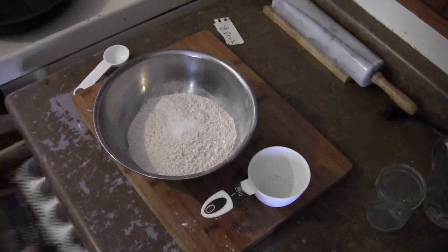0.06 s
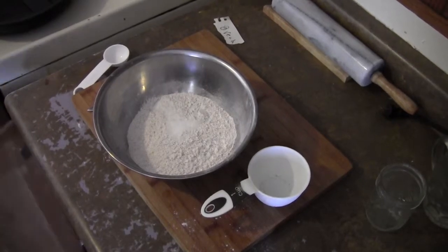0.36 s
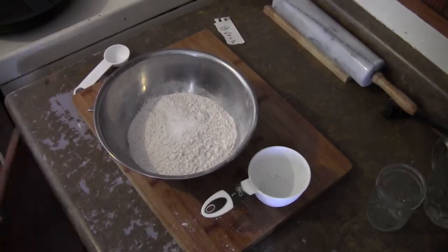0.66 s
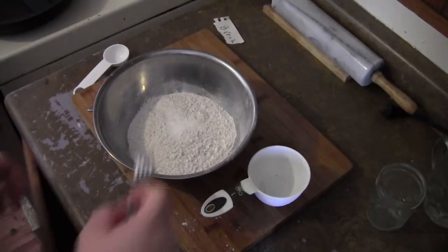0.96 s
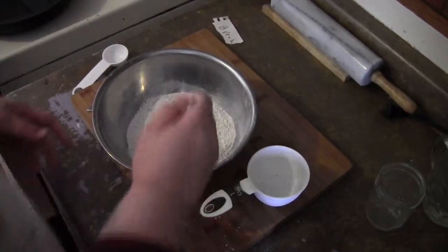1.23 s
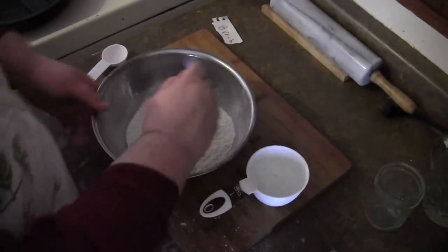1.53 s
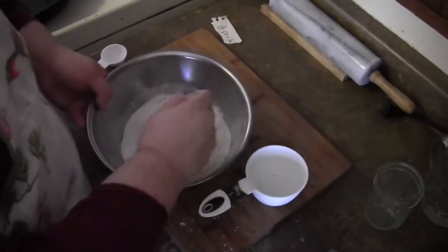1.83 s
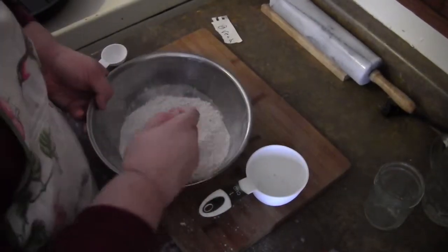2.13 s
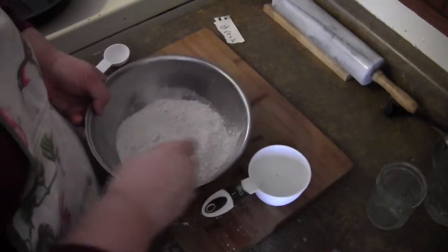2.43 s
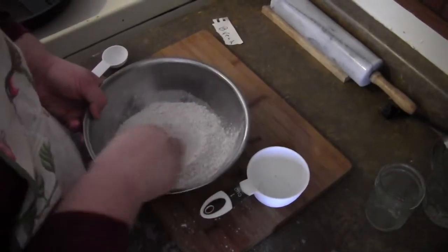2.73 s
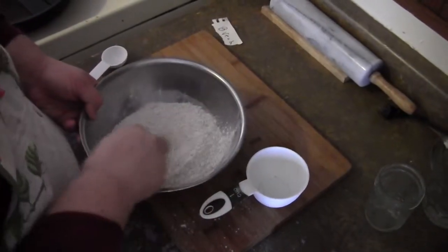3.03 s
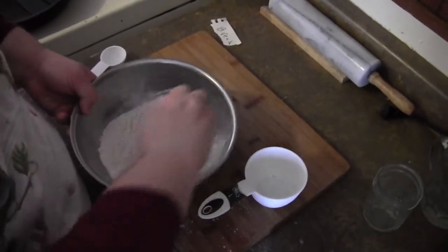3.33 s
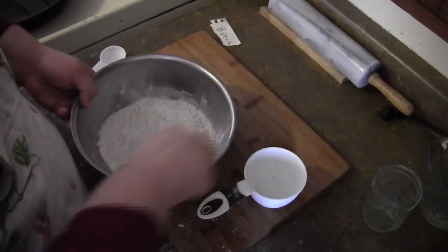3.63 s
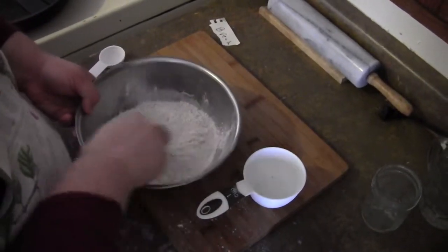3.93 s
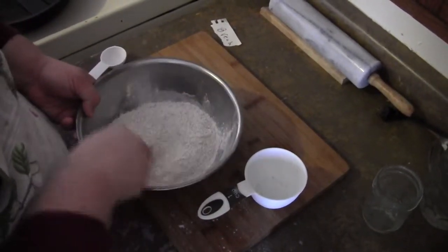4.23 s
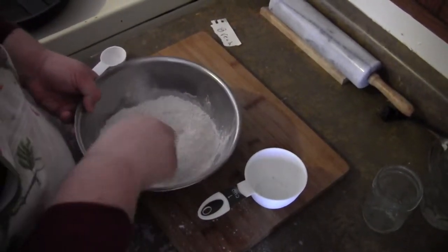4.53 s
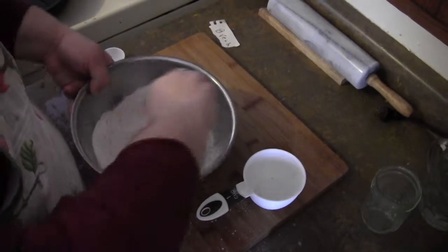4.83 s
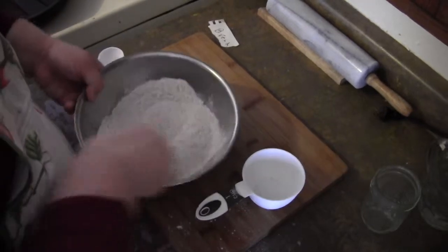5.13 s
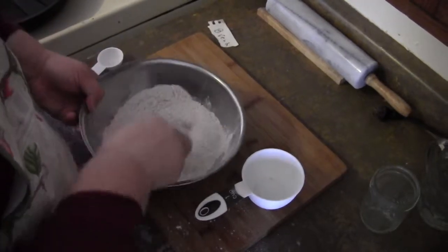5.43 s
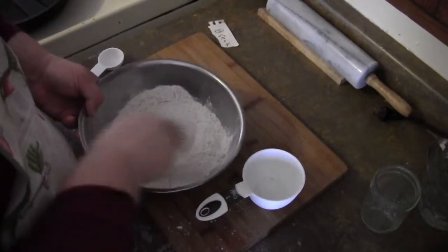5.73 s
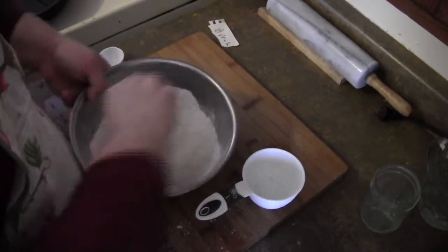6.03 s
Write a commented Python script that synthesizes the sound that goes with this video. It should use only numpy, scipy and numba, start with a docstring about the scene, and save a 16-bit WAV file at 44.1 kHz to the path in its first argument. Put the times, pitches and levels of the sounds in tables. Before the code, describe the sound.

A wooden drawer rumbles along its runners and bangs shut, the cutlery inside jangling. A fork clinks against a steel bowl, whose rim rings faintly, and the bowl knocks several times on a wooden board. Then the fork stirs dry flour in soft, gritty, uneven strokes, with light ticks, low bumps and one louder hollow thud. The sounds are close and near the centre, in a quiet home kitchen.

```python
"""A cutlery drawer rumbles shut in a home kitchen, its contents rattling, and bangs on its stop.
A fork clinks, a steel bowl knocks on a wooden board as it is pulled closer, then the fork stirs dry
flour and salt in slow strokes, scraping and tapping the bowl. Runners, cutlery and powder are streams
of tiny contacts that excite wood and steel; each blow is a crack, dying noise and the struck body's ring."""
import sys
import numpy as np
from scipy import signal
from scipy.fft import rfft, irfft, next_fast_len
from scipy.io import wavfile
from scipy.ndimage import uniform_filter1d
from numba import njit

SR = 44100
rng = np.random.default_rng(int(sys.argv[2]) if len(sys.argv) > 2 else 0)


def dump(signal):
    """Clip the signal to [-1, 1] and save it as 16-bit WAV at the path in sys.argv[1]."""
    limited = np.clip(np.atleast_2d(signal).T, -1, 1)
    pcm = np.round(limited * 32767).astype(np.int16)
    wavfile.write(sys.argv[1], SR, pcm)


N = 267863
TIME = np.arange(N) / SR

# how hard the runners shake the drawer: (time [s], level [dB])
RUNNER_SHAKE = [(0.0, -22.5), (0.058, -22), (0.1, -16), (0.132, -24.5), (0.278, -14), (0.318, -21),
                (0.426, -23), (0.44, -18.5)]


def from_db(db):
    return 10 ** (np.asarray(db) / 20)


def rms_one(x):
    return x / np.sqrt(np.mean(x ** 2) + 1e-20)


def even(x):
    """Hold the level at 1 over a twentieth of a second, keeping the fine grit."""
    return x / np.sqrt(np.maximum(uniform_filter1d(x * x, size=2205), 1e-12))


def at_hz(points, hz):
    """Read a table on a log-frequency axis."""
    points_hz, values = np.transpose(points)
    return np.interp(np.log(np.maximum(hz, 1)), np.log(points_hz), values)


def level(rows):
    """Gain from a curve in dB, fading quickly after its end."""
    s, db = np.transpose(rows)
    return from_db(np.interp(TIME, s, db)) * np.exp(-np.maximum(TIME - s[-1], 0) / 0.056)


def envelope(s, length, attack_s, t60):
    """Linear attack, hold, exponential release."""
    attack = np.clip((TIME - s) / attack_s, 0, 1)
    return attack * from_db(-60 * np.clip((TIME - s - length) / t60, 0, 2))


def add(track, s, sound):
    """Lay a sound into a track at a time."""
    start = round(s * SR)
    track[start:start + len(sound)] += sound[:N - start]


def butter(x, order, hz, kind="low"):
    return signal.sosfilt(signal.butter(order, hz, kind, fs=SR, output="sos"), x)


def colour(x, spectrum, tilt_db=0):
    """Minimum-phase EQ of unit power gain, tilted per octave above 300 Hz."""
    size = 2 * next_fast_len(len(x) // 2 + 4096)
    hz = np.arange(size // 2 + 1) * SR / size
    gain = rms_one(from_db(at_hz(spectrum, hz) + tilt_db * np.log2(np.maximum(hz / 300, 1))))
    cepstrum = irfft(np.log(gain + 1e-9))[:size // 2]
    cepstrum[1:] *= 2
    return irfft(rfft(x, size) * np.exp(rfft(cepstrum, size)))[:len(x)]


def resonate(x, hz, width_hz):
    """Two-pole resonance with gain 1 at its peak."""
    r = np.exp(-np.pi * width_hz / SR)
    feedback = [1, -2 * r * np.cos(2 * np.pi * hz / SR), r * r]
    return signal.lfilter(np.array([1, 0, -1]) * (1 - r * r) / 2, feedback, x + 1e-18)


@njit
def glide(x, angle, r):
    """Two-pole resonance whose centre (radians a sample) moves."""
    out = np.zeros(len(x))
    for i in range(2, len(x)):
        drive = (1 - r * r) / 2 * (x[i] - x[i - 2])
        out[i] = drive + 2 * r * np.cos(angle[i]) * out[i - 1] - r * r * out[i - 2]
    return out


def drift(per_s):
    """Random wander; rms 1."""
    knots = rng.standard_normal(2048)
    return rms_one(np.interp(TIME * per_s, np.arange(len(knots)), knots))


def grains(per_s, spread_db):
    """Random tiny contacts of uneven size; rms 1."""
    sizes = from_db(spread_db * np.minimum(rng.exponential(1, N), 4)) * rng.choice([-1, 1], N)
    return rms_one(sizes * (rng.random(N) < per_s / SR))


def dying_noise(t):
    """Dense resonances, every band fading at its own pace."""
    # how wood and kitchen ring on after a blow: (frequency [Hz], t60 [s])
    decays = [(80, 0.66), (250, 0.37), (600, 0.39), (1500, 0.31), (4000, 0.28), (11000, 0.47)]
    out, edges = 0, np.geomspace(30, 18000, 12)
    white = rfft(rng.choice([-1., 1.], len(t)))
    hz = np.arange(len(t) // 2 + 1) * SR / len(t)
    for low, high in zip(edges, edges[1:]):
        band = irfft(white * ((hz >= low) & (hz < high)), len(t))
        out = out + band * from_db(-60 * t / at_hz(decays, np.sqrt(low * high)))
    return out


def blows(rows, spectrum, crack, clatter_t60, tail_db, modes=(), modes_db=0):
    """Each blow is a crack, a quickly dying clatter, a room tail and any modes given for the body."""
    out, t = np.zeros(N), TIME[:SR]
    for s, db, tilt_db in rows:
        clatter = rng.choice([-1., 1.], len(t)) * from_db(-60 * t / clatter_t60)
        force = clatter + from_db(tail_db) * dying_noise(t)
        force[0] += crack
        sound = colour(force, spectrum, tilt_db)
        for k, (hz, mode_db, t60) in enumerate(modes):
            strength_db = modes_db + mode_db + tilt_db * np.log2(max(hz / 300, 1)) + rng.normal(0, 5.3)
            sound += (-1) ** k * from_db(strength_db - 60 * t / t60) * np.sin(2 * np.pi * hz * t)
        add(out, s, from_db(db) * sound)
    return out


def kitchen(x, wet_db, t60):
    """Direct sound plus diffuse reflections from the counter and walls."""
    t = TIME[:SR // 2]
    echoes = rng.standard_normal(len(t)) * from_db(-60 * t / t60) * (t > .003)
    return x + from_db(wet_db) * signal.fftconvolve(x, echoes / np.linalg.norm(echoes))[:N]


def stereo(x, pan_db, wide_db):
    """Left and right are nearly alike; late reflections part them, most in the treble."""
    # stereo width: (frequency [Hz], side over mid [dB])
    width = [(60, -33.5), (120, -27), (220, -21), (400, -15.5), (1000, -17.5), (4000, -17), (8000, -14),
             (14000, -3.5)]
    hz = np.arange(N + 1) * SR / (2 * N)
    delay = np.exp(-2j * np.pi * hz * .004)
    side = rfft(x, 2 * N) * from_db(wide_db + at_hz(width, hz)) * delay
    for lag in rng.uniform(.002, .007, 3):
        echo = np.exp(-2j * np.pi * hz * lag)
        side = side * (echo - .5) / (1 - .5 * echo)  # all-pass scatter
    side = irfft(side)[:N]
    return np.array([(x + side) * from_db(pan_db / 2), (x - side) * from_db(-pan_db / 2)])


def room_tone():
    """A faint, steady bed of dark noise."""
    # tone of the quiet kitchen: (frequency [Hz], level [dB])
    room_eq = [(15, -27.5), (25, -11), (102, 0.5), (187, -7.5), (257, 0), (363, -9.5), (436, -7.5),
               (525, -10.5), (666, -6.5), (892, -9.5), (966, -13), (4250, -22), (14000, -37.5)]
    return from_db(-56) * colour(rng.standard_normal(N), room_eq)


def drawer():
    """Rough runners shake the wooden box until it bangs shut."""
    # tone of the rolling box: (frequency [Hz], level [dB])
    rumble_eq = [(26, -55.5), (45, -20), (64, -6), (138, -2), (299, -9), (536, -6.5), (589, -17.5),
                 (743, -9), (1110, -17.5), (1680, -18.5), (1810, -25), (1980, -27.5), (2130, -24),
                 (12000, -66.5), (15600, -83), (22000, -120)]
    # the drawer meets its catch and its stop: (time [s], level [dB], treble tilt [dB/octave])
    hits = [(.093, -34, -10.5), (.223, -13, 2.5), (.270, -13, -2), (.464, -4.5, -2.5), (.486, -5.5, -3.5),
            (.562, -13.5, -2), (.606, -17, -3), (.796, -37, 1.5), (.829, -39, -13), (.851, -39, 0.5),
            (.958, -44.5, -2)]
    # tone of the struck box: (frequency [Hz], level [dB])
    bang_eq = [(29, -48.5), (50, -25), (98, -13), (370, -10.5), (524, -4), (603, -7), (895, -3.5),
               (1330, -6.5), (1600, -6), (1720, -7.5), (4670, -21.5), (6620, -29), (10100, -41.5),
               (13000, -56)]
    rumble = colour(grains(per_s=2700, spread_db=1.0), rumble_eq) * level(RUNNER_SHAKE)
    bangs = blows(hits, bang_eq, crack=9.3, clatter_t60=0.048, tail_db=-1.5)
    return from_db(-1.5) * rumble + from_db(-3.5) * bangs


def cutlery():
    """Colliding pieces ring with their own partials, rattling with the runners and jangling at jolts."""
    # jolts to the cutlery: (time [s], length [s], level [dB])
    jolts = [(0.188, 0.02, -35), (0.229, 0.02, -27), (0.461, 0.13, -28), (0.728, 0.024, -41.5),
             (0.974, 0.032, -60)]
    # tone of the jangle: (frequency [Hz], level [dB])
    jangle_eq = [(700, -30.5), (1500, -2.5), (2500, 4.5), (3500, -1.5), (4800, -9), (6600, -0.5),
                 (8000, -5.5), (10000, -6.5), (12500, -14.5), (15000, -23.5)]
    rings = 0
    for partials_hz in rng.uniform(1300, 14000, size=(12, 10)):  # 12 pieces, 10 partials each
        hits = grains(per_s=70, spread_db=3.5)
        ring = rms_one(sum(resonate(hits, hz, width_hz=27) for hz in partials_hz))
        rings = rings + 0.38 * hits + ring
    jangle = sum(from_db(db) * envelope(s, length, attack_s=0.023, t60=0.17) for s, length, db in jolts)
    rattle = from_db(-33.5) * level(RUNNER_SHAKE)
    return kitchen(rms_one(colour(rings, jangle_eq)) * (jangle + rattle), wet_db=-10, t60=0.4)


def fork_clinks():
    """A tick of steel on steel and the short ring of the held fork."""
    # the fork touches bare steel: (time [s], level [dB])
    touches = [(1.249, -17.5), (2.145, -55), (2.423, -51), (2.705, -54), (3.534, -43), (3.711, -37)]
    # tone of the tick: (frequency [Hz], level [dB])
    tick_eq = [(500, -13.5), (1500, -22.5), (3200, -9.5), (5000, -29), (6400, -2), (7300, -0.5),
               (8600, -4.5), (10500, -12.5), (13500, -34)]
    # ring of the struck fork: (frequency [Hz], level [dB], t60 [s])
    fork_modes = [(3060, -18, 0.11), (3740, -20, 0.053), (6370, -13, 0.17), (6600, -20.5, 0.057),
                  (7200, -4.5, 0.081), (7240, -9.5, 0.088), (8100, -6, 0.074)]
    out, t = np.zeros(N), TIME[:SR]
    for s, db in touches:
        sound = 0.48 * colour(rng.standard_normal(len(t)), tick_eq) * from_db(-60 * t / 0.1)
        for hz, mode_db, t60 in fork_modes:
            sound += from_db(mode_db - 60 * t / t60) * np.sin(2 * np.pi * (hz * t + rng.random()))
        add(out, s, from_db(db - 1) * sound)
    return kitchen(out, wet_db=-11, t60=0.21)


def rim_ring():
    """The bowl's rim sings like a faint bell until a hand grips it."""
    # the free rim is struck: (time [s], level [dB], treble tilt [dB/octave])
    hits = [(1.249, -45, -5), (1.310, -41.5, -5.5)]
    # partials of the free rim: (frequency [Hz], level [dB], t60 [s])
    rim_modes = [(1475, -14.5, 0.99), (1850, -16, 1.3), (2340, -5, 0.87), (2853, -16.5, 4),
                 (3435, 1.5, 2.6), (4043, -13, .8), (4630, -5, 0.81), (5240, 1, 0.53), (6470, -9, .7),
                 (6837, -17.5, 1.9)]
    grip_s, grip_t60 = 1.64, 0.2
    out, t = np.zeros(N), TIME[:SR]
    for s, db, tilt_db in hits:
        for hz, mode_db, t60 in rim_modes:
            strength_db = db + mode_db + tilt_db * np.log2(hz / 6000)
            add(out, s, from_db(strength_db - 60 * t / t60) * np.sin(2 * np.pi * hz * t))
    return out * from_db(-60 * np.maximum(TIME - grip_s, 0) / grip_t60)


def bowl_knocks():
    """The bowl is pulled closer and knocks on the wooden board, setting it ringing."""
    # the bowl lands on the board: (time [s], level [dB], treble tilt [dB/octave])
    hits = [(1.283, -25.5, -13), (1.310, -4, 0), (1.365, -17, -4.5), (1.388, -18, -1.5), (1.409, -18.5, -8),
            (1.435, -15, -4), (1.585, -50, 6.5), (1.640, -3.5, 0), (1.772, -5, -1)]
    # tone of a knock: (frequency [Hz], level [dB])
    knock_eq = [(25, -25), (50, -12), (80, -9.5), (130, -9.5), (200, -3), (290, 1), (380, -5), (460, -12),
                (560, -10.5), (1000, -11.5), (2500, -18.5), (5500, -28), (9000, -40.5), (13000, -63)]
    # ring of the board: (frequency [Hz], level [dB], t60 [s])
    board_modes = [(77.9, -22.5, 0.75), (134.6, -11.5, 0.43), (158.3, -9, 0.18), (234.7, -15.5, 0.51),
                   (292.2, -3.5, 0.08), (304.5, -4, 0.21), (390, -11.5, 0.3), (540, -17, 0.33),
                   (760, -14.5, 0.32), (876, -7.5, 0.11), (1463, -17, 0.21)]
    knocks = blows(hits, knock_eq, crack=3.4, clatter_t60=0.17, tail_db=-6.5,
                   modes=board_modes, modes_db=-1)
    return from_db(-3) * knocks


def fork_motion():
    """Each sweep swells and rises in pitch towards its middle; catches cut in sharply."""
    # sweeps through the flour:
    # (time [s], length [s], bowl rasp [dB], tine hiss [dB], rasp pitch [Hz], tine pitch [Hz])
    strokes = [ (1.818, 0.16, -40, -45, 2440, 7700), (2.137, 0.11, -44.5, -42.5, 1970, 6550),
               (2.266, 0.096, -46, -44, 2280, 7200), (2.412, 0.092, -51, -56, 1960, 6900),
               (2.601, .035, -47.5, -60, 1940, 6150), (2.682, 0.47, -47.5, -55, 2240, 6000),
               (2.939, 0.096, -43, -44, 1990, 6000), (3.085, 0.17, -58, -55, 1540, 6000),
               (3.523, 0.18, -53, -51.5, 1690, 8000), (3.732, .16, -48.5, -44.5, 1170, 7600),
               (3.914, 0.23, -52, -50.5, 1870, 6200), (4.213, 0.052, -43.5, -47, 2200, 5960),
               (4.258, 0.079, -36.5, -47, 1620, 6240), (4.351, 0.13, -48.5, -62, 1140, 6050),
               (4.432, 0.1, -56, -45.5, 2200, 6500), (4.56, 0.12, -42.5, -46.5, 2540, 5460),
               (4.77, 0.18, -51, -50, 1500, 6900), (4.922, 0.26, -49.5, -49.5, 1300, 6600),
               (5.158, 0.12, -50, -44, 1670, 6750), (5.258, 0.19, -50, -52, 1330, 6300),
               (5.411, 0.096, -50.5, -44.5, 2460, 5900), (5.588, 0.13, -39, -47.5, 1720, 6300),
               (5.744, 0.17, -51.5, -46, 2150, 6300), (5.914, .11, -42, -45.5, 2370, 5600), ]
    # a tine catches and judders: (time [s], length [s], bowl rasp [dB], tine hiss [dB])
    catches = [(2.085, .012, -50, -60), (2.145, 0.022, -37.5, -51), (2.19, 0.0051, -30, -37.5),
               (2.674, 0.032, -46.5, -50.5), (3.118, 0.03, -49, -49.5), (3.707, 0.0064, -51, -38),
               (3.886, 0.023, -39, -42), (4.205, .025, -44, -55), (5.115, 0.014, -42, -41),
               (5.182, 0.0091, -46.5, -37)]
    swell_db, pitch_sag, uneven_db = 4, 0.14, 1.36
    dragging = TIME > strokes[0][0]  # between sweeps the fork drags lightly
    pressure, speed = from_db(-64.5) * dragging, from_db(-71) * dragging
    rasp_path, tine_path = [], []
    for s, length, rasp_db, hiss_db, rasp_hz, tine_hz in strokes:
        arch = np.sin(np.pi * np.clip((TIME - s) / length, 0, 1))
        sweep = envelope(s, length, attack_s=0.029, t60=0.13) * from_db(swell_db * (arch - 1))
        pressure = np.hypot(pressure, from_db(rasp_db) * sweep)
        speed = np.hypot(speed, from_db(hiss_db) * sweep)
        slow_hz = rasp_hz * (1 - pitch_sag)
        rasp_path += [(s, slow_hz), (s + length / 2, rasp_hz), (s + length, slow_hz)]
        tine_path += [(s + length / 2, tine_hz)]
    for s, length, rasp_db, hiss_db in catches:
        judder = envelope(s, length, attack_s=0.0018, t60=0.094)
        pressure = np.maximum(pressure, from_db(rasp_db) * judder)
        speed = np.maximum(speed, from_db(hiss_db) * judder)
    pressure *= from_db(uneven_db * drift(per_s=45))  # the hand presses unevenly
    speed *= from_db(uneven_db * drift(per_s=45))
    rasp_hz = np.interp(TIME, *np.transpose(sorted(rasp_path)))
    tine_hz = np.interp(TIME, *np.transpose(tine_path))
    return pressure, speed, rasp_hz, tine_hz


def steel(x, ring_s, direct):
    """The bowl's many damped overtones, mixed anew as the contact point wanders."""
    out, t, hop = direct * x, TIME[:SR // 25], SR // 7
    window = np.sqrt(np.hanning(2 * hop))
    for start in range(0, N - hop, hop):
        response = rng.standard_normal(len(t)) * np.exp(-t / ring_s)
        touch = x[start:start + 2 * hop] * window[:N - start]
        add(out, start / SR, signal.fftconvolve(touch, response / np.linalg.norm(response)))
    return out


def scraped(modes, centre_hz, width_hz, glide_db, uneven_db, ring_s):
    """Gritty friction rings the body's modes and a resonance that glides with the contact point."""
    grit = from_db(2.2 * drift(per_s=90))
    friction = grains(per_s=3000, spread_db=2.5) * grit
    body = sum((-1) ** k * resonate(friction, hz, width) * from_db(db + uneven_db * drift(per_s=10))
               for k, (hz, width, db) in enumerate(modes))
    angle, r = 2 * np.pi * centre_hz / SR, np.exp(-np.pi * width_hz / SR)
    coarse_friction = grains(per_s=3000, spread_db=5) * grit
    moving = glide(glide(coarse_friction, angle, r), angle, r)
    return steel(even(body) + from_db(glide_db) * even(moving), ring_s, direct=0.3)


def stirring():
    """Powder grinds between tines and steel; the friction rings bowl and fork and swishes on its own."""
    # resonances of the flour-damped bowl: (frequency [Hz], width [Hz], level [dB])
    bowl_modes = [(770, 170, -17), (1270, 230, 0), (1590, 49, -1.5), (1700, 50, 0.5), (2130, 17, -34),
                  (2223, 63, 0.5), (2370, 47, 5), (2665, 220, 4.5), (2923, 12, -0.5), (3305, 220, -7.5),
                  (3704, 230, 0.5)]
    # resonances of the held fork: (frequency [Hz], width [Hz], level [dB])
    tine_modes = [(4460, 150, -40), (5560, 200, 3), (6030, 160, 16.5), (6520, 67, -21), (7220, 260, 10.5),
                  (8400, 67, 6), (8050, 51, -16), (9670, 260, -2), (10800, 700, -18)]
    # tone of the powder's swish: (frequency [Hz], level [dB])
    powder_eq = [(40, -6), (80, -18), (150, -4), (260, -1), (520, -3), (800, 3.5), (1400, -4.5), (3200, -7),
                 (4500, -2.5), (6500, 3.5), (9500, -12), (12000, -9), (14500, -30)]
    pressure, speed, rasp_hz, tine_hz = fork_motion()
    bowl = scraped(bowl_modes, rasp_hz, width_hz=770, glide_db=-3.5, uneven_db=5.0, ring_s=0.0052)
    tines = scraped(tine_modes, tine_hz, width_hz=1900, glide_db=-2.5, uneven_db=5.5, ring_s=0.0014)
    powder = steel(grains(per_s=2000, spread_db=2.5), ring_s=0.0035, direct=0.7)
    rasp = from_db(-0.5) * even(butter(bowl, 2, 4000)) * pressure
    hiss = from_db(-1.5) * even(butter(tines, 2, [4800, 12500], "band")) * speed
    swish = from_db(-4.5) * even(colour(powder, powder_eq)) * np.sqrt(pressure * speed)
    return kitchen(rasp + hiss + swish, wet_db=-9, t60=0.21)


def bowl_rocking():
    """The held bowl rocks under the strokes with soft, low bumps."""
    # bumps on the board: (time [s], level [dB], treble tilt [dB/octave])
    hits = [(2.146, -37, 1), (2.425, -34, 3), (2.70, -36, 5.5), (2.775, -45, -7), (3.271, -36, 1.5),
            (3.323, -34, 0.5), (3.535, -35, 3.5), (3.571, -34.5, -4), (3.91, -38.5, 4), (3.983, -42, 4),
            (4.09, -56, 0), (4.50, -49.5, 4), (5.23, -45, -4), (5.31, -43.5, 4), (5.68, -47, 4.5),
            (6.02, -41, 4)]
    # tone of a bump: (frequency [Hz], level [dB])
    bump_eq = [(40, -44), (78, 2.5), (105, -9), (150, 1), (195, -19), (245, 3), (300, -14.5), (380, -6),
               (480, -27), (900, -25.5), (2000, -33), (5000, -33.5), (13000, -48)]
    bumps = blows(hits, bump_eq, crack=8.4, clatter_t60=0.12, tail_db=-13)
    return from_db(3) * butter(bumps, 1, 2210)  # the hand cushions the contact


def fork_thuds():
    """The fork hits the bowl through the flour and draws a hollow ring."""
    # muffled hits: (time [s], level [dB], treble tilt [dB/octave])
    hits = [(3.535, -41.5, 5.5), (3.713, -40.5, 7.5), (3.74, -41, 5), (3.776, -41.5, 7.5), (4.780, -14, 2),
            (4.789, -21, -5)]
    # tone of a thud: (frequency [Hz], level [dB])
    thud_eq = [(60, -19), (180, -3), (320, 6), (430, -0.5), (560, 7.5), (800, -4.5), (1050, -3),
               (1500, -20), (2400, -31), (4000, -40.5), (12000, -55)]
    # ring of the flour-filled bowl: (frequency [Hz], level [dB], t60 [s])
    hollow_modes = [(334, -14, 0.096), (511, -24, 0.6), (703, -11.5, 0.24), (772, -16, 0.081),
                    (970, -3, 0.022)]
    thuds = blows(hits, thud_eq, crack=2.5, clatter_t60=0.049, tail_db=-16,
                  modes=hollow_modes, modes_db=-7.5)
    return from_db(0.5) * butter(thuds, 2, 222, "high")  # the light fork moves little bass


def scene():
    """Drawer, board and steel sit near the centre of a wide room tone."""
    board = bowl_knocks() + bowl_rocking() + fork_thuds()
    room = room_tone()
    return (stereo(drawer() + cutlery(), pan_db=-0.7, wide_db=0)
            + stereo(room, pan_db=0.2, wide_db=14.5)
            + stereo(board, pan_db=0.7, wide_db=-1.2)
            + stereo(stirring() + fork_clinks() + rim_ring(), pan_db=-1.7, wide_db=-0.5))


def record(dry):
    """The loudest peaks are rounded and the top rolls off."""
    softened = butter(np.tanh(dry), 6, 13300)
    return signal.sosfilt(signal.ellip(10, .2, 90, 14800, fs=SR, output="sos"), softened)


dry = scene()
out = record(dry)
dump(out)
```